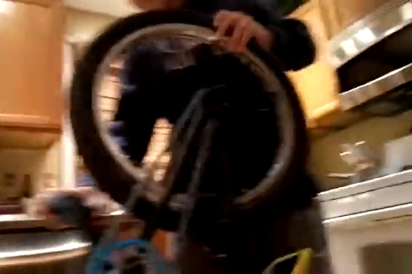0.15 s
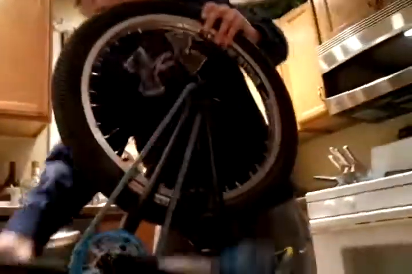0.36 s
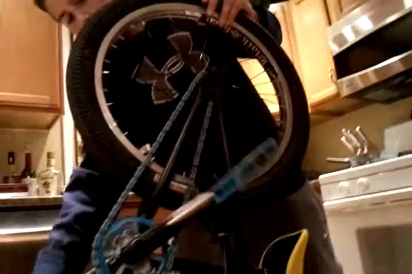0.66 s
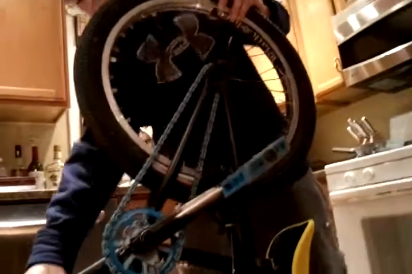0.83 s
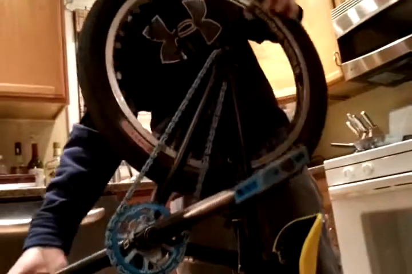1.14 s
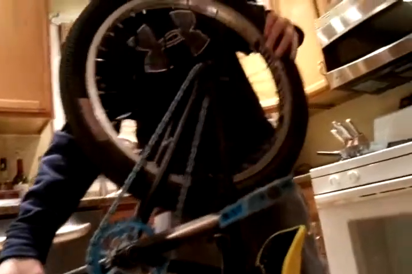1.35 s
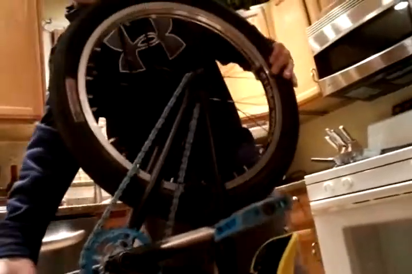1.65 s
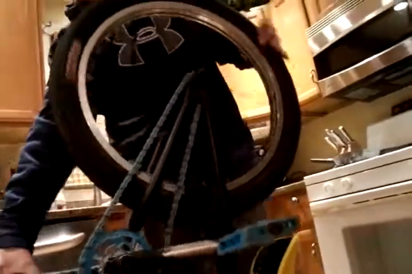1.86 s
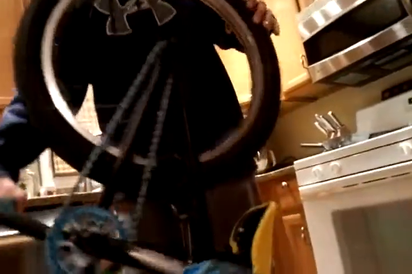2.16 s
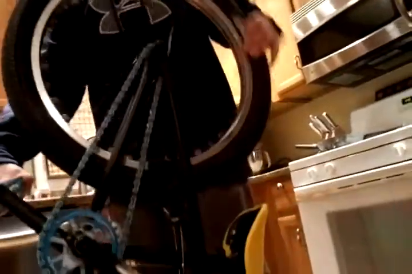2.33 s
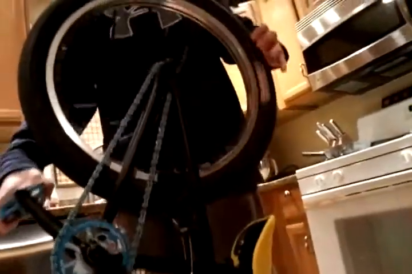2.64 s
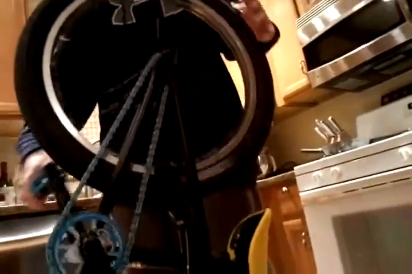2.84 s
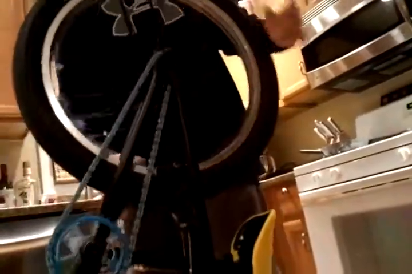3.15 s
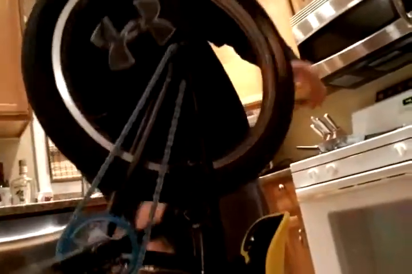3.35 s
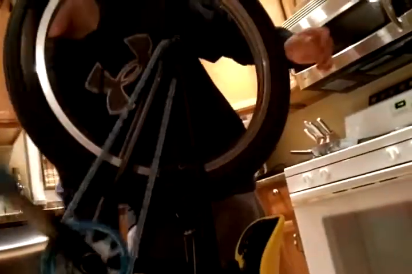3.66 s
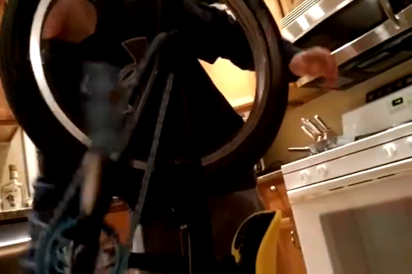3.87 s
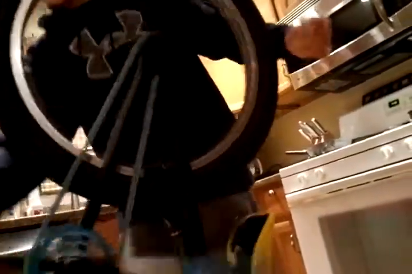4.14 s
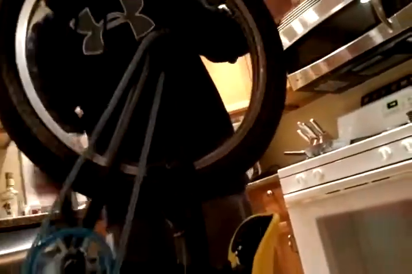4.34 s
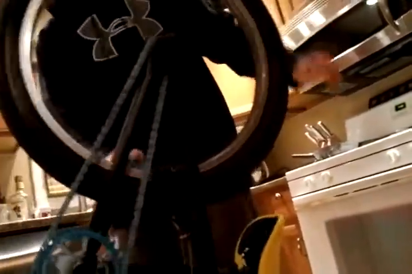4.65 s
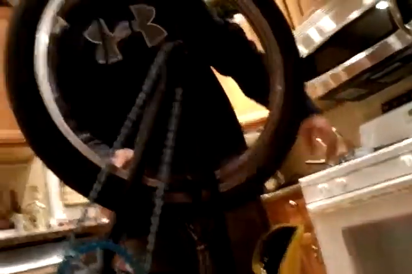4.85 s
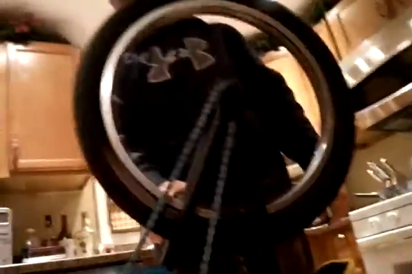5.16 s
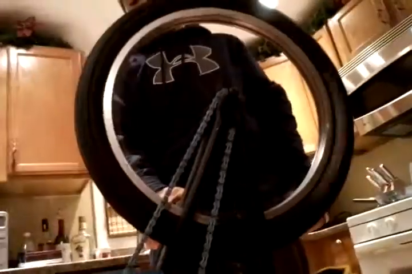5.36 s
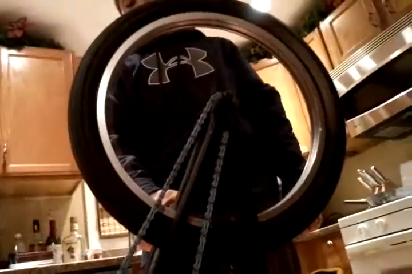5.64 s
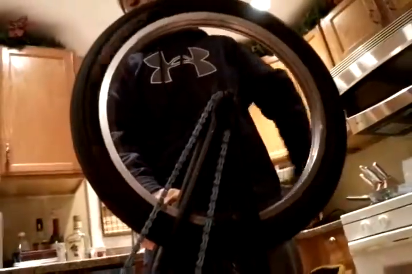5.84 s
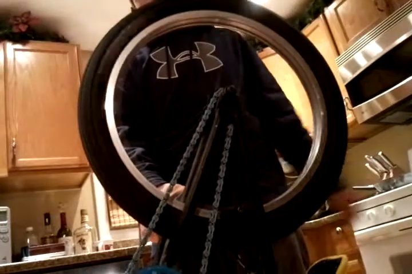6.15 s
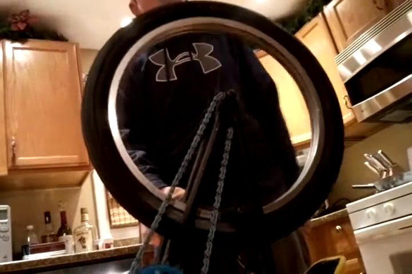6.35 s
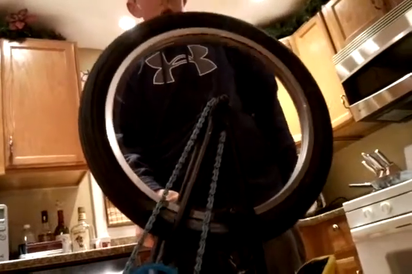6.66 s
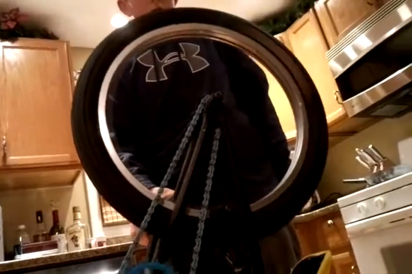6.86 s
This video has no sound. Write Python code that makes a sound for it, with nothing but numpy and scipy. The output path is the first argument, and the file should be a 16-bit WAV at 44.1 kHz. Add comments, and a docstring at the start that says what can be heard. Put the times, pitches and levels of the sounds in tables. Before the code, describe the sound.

A bicycle hub is heard close up in a small, hard-walled kitchen, over soft room air, very faint appliance tones and low microphone-handling rumble. From about 0.1 to 0.7 s, crisp metallic ratchet clicks run at some forty to fifty a second, with light frame knocks near 0.45-0.5 s and gritty chain rustle. Then it is mostly quiet: a tick and soft knock at 0.85, a sharp crack at 1.76, and the strongest dull, hollow clunk at 2.03 with a deep lurch of rumble. Faint stray ticks and chain rustle follow until 2.5. From 2.95, very soft, slightly uneven clicks quicken and strengthen, with small knocks around 3.45-3.5. At 4.65 the wheel runs free: a bright, fast, even buzz of about a hundred clicks a second with low popping, gently pulsing each turn, slowing to around eighty and continuing through the end at 7 s.

```python
"""A freewheel hub on an upside-down bicycle in a kitchen: the crank is turned by hand, then the rear wheel runs free.
Pawls click over ratchet teeth, slowly at first, then as a fast even buzz: filtered noise puffs and ringing modes.
Frame knocks are noise bursts with ringing tubes; the chain is clumped, coloured grain noise.
Behind lie room air, faint tones and the low rumble of the hand-held microphone; hard walls reflect the bicycle."""
import sys
import numpy as np
from scipy import signal
from scipy.fft import rfft, irfft, next_fast_len
from scipy.io import wavfile

SR = 44100
rng = np.random.default_rng(int(sys.argv[2]) if len(sys.argv) > 2 else 0)


def unload_wav(signal):
    """Save mono or channel-first audio to the path in sys.argv[1] as 16-bit WAV at rate SR, clipped to [-1, 1]."""
    wavfile.write(
        sys.argv[1],
        SR,
        np.round(np.clip(np.atleast_2d(signal).T, -1, 1) * 32767).astype(np.int16),
    )


N = 308700


def from_db(db):
    """Decibels to amplitude ratio."""
    return 10 ** (np.asarray(db) / 20)


def rms_one(x):
    """Scales a signal to an RMS of 1."""
    return x / np.sqrt(np.mean(x ** 2) + 1e-20)


def in_time(rows):
    """Amplitude curve through (time_s, level_db) points, straight in dB."""
    time_s, level_db = np.transpose(rows)
    return from_db(np.interp(np.arange(N) / SR, time_s, level_db))


def band(x, order, low_hz, high_hz):
    """Butterworth band-pass."""
    return signal.sosfilt(signal.butter(order, [low_hz, high_hz], "band", fs=SR, output="sos"), x)


def colour(x, spectrum):
    """Filters by (freq_hz, gain_db) points, interpolated over log frequency."""
    freq_hz, gain_db = np.transpose(spectrum)
    size = next_fast_len(len(x) + 2000)
    log_freq = np.log(np.arange(size // 2 + 1) * SR / size + 1)
    gain = from_db(np.interp(log_freq, np.log(freq_hz), gain_db))
    return irfft(rfft(x, size) * gain, size)[:len(x)]


def drift(cutoff_hz):
    """Slow random curve of RMS 1: low-passed noise."""
    low_pass = signal.butter(2, cutoff_hz, fs=SR, output="sos")
    return rms_one(signal.sosfilt(low_pass, rng.standard_normal(N)))


def strike(times_s, gains):
    """Train of impulses."""
    train = np.zeros(N + SR)
    np.add.at(train, np.round(np.asarray(times_s) * SR).astype(int), gains)
    return train[:N]


def ring(times_s, level_db, modes, spread_db, random_sign=True):
    """Each blow excites two-pole resonators (freq_hz, level_db, t60_s), each mode at a random strength."""
    out = np.zeros(N)
    luck = rng.standard_normal((len(times_s), len(modes), 2))
    for k, (freq_hz, mode_db, t60_s) in enumerate(modes):
        radius = from_db(-60 / (t60_s * SR))
        angle = 2 * np.pi * freq_hz / SR
        gains = from_db(level_db + mode_db + spread_db * luck[:, k, 0])
        if random_sign:
            gains = gains * np.sign(luck[:, k, 1])
        blows = strike(times_s, gains) + 1e-18  # keeps the filter off denormals
        out += signal.lfilter([0, np.sin(angle)], [1, -2 * radius * np.cos(angle), radius ** 2], blows)
    return out


def burst(times_s, level_db, t60_s):
    """Each blow releases exponentially decaying random-sign noise."""
    decay = from_db(-60 / (t60_s * SR))
    envelope = signal.lfilter([1], [1, -decay], strike(times_s, from_db(level_db)))
    return envelope * rng.choice([-1, 1], N)


def hub():
    """Ratchet clicks and low pops; a taut chain changes the click colour and the rings of the hub."""
    # rings of hub shell and spokes: freq_hz, coasting_db, taut_db, t60_s
    ring_modes = np.array([(2620, -37, -44, .03), (2850, -37, -50, .03), (3285, -32, -46, .03),
                           (3740, -46, -36, .07), (4460, -33, -36, .015)])
    # click spectra: freq_hz, gain_db
    coasting_colour = [(530, -43), (900, -20), (1250, -23.5), (1830, -19), (2770, -13), (2990, -14.5),
                       (3230, -6), (3550, -12.5), (3970, -11), (4290, -3), (5230, -2), (7000, -16.5),
                       (9100, -53.5), (15400, -120)]
    taut_colour = [(530, -40.5), (900, -18), (1120, -16.5), (1350, -23.5), (2090, -20), (2240, -19.5),
                   (3040, -17.5), (5010, -1), (6710, -12.5), (7000, -19.5), (9100, -48), (15400, -120)]
    # crank drives the wheel: start_s, end_s
    start_s, end_s = (2.9, 4.64)

    at_s, level_db, low_pops = teeth(scatter_db=0.5)
    taut = (at_s > start_s) & (at_s < end_s)
    coasting_modes, taut_modes = ring_modes[:, [0, 1, 3]], ring_modes[:, [0, 2, 3]]
    coasting = pawls(at_s[~taut], level_db[~taut], coasting_colour, coasting_modes, scatter_db=2.5)
    driven = pawls(at_s[taut], level_db[taut], taut_colour, taut_modes, scatter_db=1.0)
    return coasting + driven, low_pops


def teeth(scatter_db):
    """Times and levels of tooth drops: slow runs, stray ticks, then the buzz with its low pops."""
    # ratchet rotation, one click a tooth: time_s, teeth_passed
    backpedal = [(.0691, 0), (.0977, 1), (.198, 6), (.3346, 12), (.4117, 16), (.5613, 25), (.6434, 29),
                 (.6944, 31), (.7292, 32)]
    driven = [(2.9562, 0), (3.0445, 1), (3.3696, 5), (3.6372, 9), (3.8194, 12), (3.9716, 15), (4.1835, 20),
              (4.3618, 25), (4.6526, 34)]
    freewheel = [(4.6618, 0), (4.7409, 8), (4.8109, 16), (4.8858, 24), (4.9724, 32), (5.1596, 48),
                 (5.4496, 72), (6.3336, 144), (7.0486, 200)]
    # relative click strength: time_s, level_db
    click_levels = [(.07, -18), (.25, -18.5), (.45, -16.5), (.65, -18.5), (.73, -20), (2.95, -38.5),
                    (3.06, -31), (3.8, -28), (4.0, -25), (4.15, -22.5), (4.46, -20), (4.56, -24.5),
                    (4.652, -21), (4.662, -23), (4.69, -18), (6.0, -17), (7.0, -16.5)]
    # faint driven clicks: time_s, loss_db
    faint = [(3.213, 3.5), (3.381, 4), (3.82, 6), (4.184, 31), (4.364, 10), (4.524, 6)]
    # stray ticks while the wheel is held, relative strength: time_s, level_db
    ticks = [(0.848, -24), (0.9134, -36.5), (1.3182, -38.5), (2.2387, -33), (2.3515, -27.5),
             (2.4468, -31.5), (2.54, -43.5)]
    teeth_per_turn, loudest_tooth, worn_tooth = 24, 8, 23
    turn_swing_db, worn_loss_db = 0.8, 4
    pop_start_db, pop_swing_db = -1.5, 1
    pop_fade_from_s, pop_fade_db_per_s = 5.8, 5

    limp_teeth = 0.13  # every other driven click comes late
    slow_s = np.r_[passing(backpedal)[1], passing(driven, limp_teeth)[1]]
    slow_db = np.interp(slow_s, *np.transpose(click_levels))
    slow_db += scatter_db * rng.standard_normal(len(slow_s))
    for time_s, loss_db in faint:
        slow_db[np.argmin(abs(slow_s - time_s))] -= loss_db

    # freewheeling: clicks swell once a turn, one tooth is weak
    tooth, fast_s = passing(freewheel)
    swell = np.cos(2 * np.pi * (tooth - loudest_tooth) / teeth_per_turn)
    worn_db = worn_loss_db * (tooth % teeth_per_turn == worn_tooth)
    fast_db = np.interp(fast_s, *np.transpose(click_levels)) + turn_swing_db * swell - worn_db
    pop_fade_db = pop_fade_db_per_s * np.maximum(fast_s - pop_fade_from_s, 0)
    pop_db = pop_start_db - pop_fade_db + pop_swing_db * swell - worn_db

    tick_s, tick_db = np.transpose(ticks)
    return np.r_[slow_s, tick_s, fast_s], np.r_[slow_db, tick_db, fast_db], pops(fast_s, pop_db)


def passing(turning, limp_teeth=0):
    """Numbers and times of teeth passing the pawls; odd teeth are delayed by limp_teeth."""
    time_s, passed = np.transpose(turning)
    tooth = np.arange(int(passed[-1]) + 1)
    return tooth, np.interp(tooth + limp_teeth * (tooth % 2), passed, time_s)


def pawls(at_s, level_db, spectrum, modes, scatter_db):
    """The first pawl snaps home, two more follow within milliseconds, one bounces; the hub shell rings."""
    luck = rng.random((len(at_s), 8))
    lags_s = np.array([0, .0008, .0024, .007]) + np.array([.0003, .0008, .0012, .002]) * luck[:, :4]
    loss_db = scatter_db * luck[:, 4:] * [0.99, 1, 0.92, 0.96]
    drops_db = np.array([-2.5, -3.5, -6.5, -8.5]) - loss_db
    times_s = (at_s[:, None] + lags_s).ravel()
    each_db = (level_db[:, None] + drops_db).ravel()
    snap = colour(burst(times_s, each_db + 11.0, t60_s=0.006), spectrum)
    return snap + ring(at_s, level_db + 9.5, modes, spread_db=3.5)


def pops(times_s, level_db):
    """Each fast tooth gives two band-passed impulses, about a millisecond apart, of random sign and size."""
    luck = rng.uniform(-0.87, 1, (len(times_s), 4))
    lags_s = np.array([.0003, .0013]) + 0.00052 * luck[:, :2]
    sizes = np.sign(luck[:, 2:]) * (0.22 + luck[:, 2:] ** 2)
    gains = from_db(level_db)[:, None] * sizes
    blows = strike((times_s[:, None] + lags_s).ravel(), gains.ravel())
    return band(blows, 2, 100, 750)


def knocks():
    """Noise crack, dull noise tail and ringing tubes; apart from them, a boom and a low rocking."""
    # frame knocks, relative levels: time_s, body_db, crack_db, sway_db, boom_db
    blows = [(0.443, -28.5, -34, -54, -54), (0.461, -25.5, -25, -51, -57), (0.514, -28, -34, -46, -48),
             (0.848, -36, -53, -42, -43.5), (1.758, -32.5, -19.5, -60, -57), (2.003, -36, -48, -39, -46.5),
             (2.029, -11, -46, -20.5, -41), (3.436, -34.5, -32, -62, -65), (3.512, -31, -36, -55, -47.5)]
    # frame tubes: freq_hz, level_db, t60_s
    tube_modes = [(231, -11, .08), (307, -9, .13), (640, -12, .07), (958, -14, .07), (1280, -14, .05),
                  (1550, -14, .05)]
    # whole bicycle rocking: freq_hz, level_db, t60_s
    sway_modes = [(21.2, -6, 0.27), (31.8, 2, 0.12)]
    # tyre and floor: freq_hz, level_db, t60_s
    boom_modes = [(145.6, 1.5, 0.21)]

    at_s, body_db, crack_db, sway_db, boom_db = np.transpose(blows)
    crack = band(burst(at_s, crack_db + 4.0, t60_s=0.0021), 2, 1000, 3500)
    thud = band(burst(at_s, body_db + 4.0, t60_s=0.026), 3, 160, 1800)
    tubes = ring(at_s, body_db - 11.0, tube_modes, spread_db=2.0)
    sway = ring(at_s, sway_db + 2.0, sway_modes, spread_db=3.0, random_sign=False)
    boom = ring(at_s, boom_db + 4.5, boom_modes, spread_db=1.0)
    return crack + thud + tubes, sway + boom


def chain():
    """Dense tiny contacts of rollers and links, coming in clumps: noise of uneven, drifting level."""
    # chain over the sprockets: time_s, level_db (rms)
    levels = [(0.0, -57.5), (0.12, -52), (0.47, -52), (0.6, -42.5), (0.76, -45.5), (0.8, -52),
              (0.97, -56.5), (1.11, -58), (1.66, -60.5), (1.72, -53), (1.82, -57.5), (2.0, -54.5),
              (2.07, -49), (2.44, -48), (2.55, -59), (3.9, -59.5), (4.2, -51), (4.7, -49)]
    # relative spectrum: freq_hz, gain_db
    spectrum = [(530, -12.5), (900, -8.5), (1310, -9.5), (2160, -9), (2370, -9.5), (2560, -8.5),
                (5180, -6.5), (6260, -7.5), (7000, -17.5), (9100, -52), (15400, -120)]
    grains = rng.standard_normal(N) * from_db(1.7 * np.minimum(rng.exponential(1, N), 4))
    clumps = grains * from_db(1.2 * drift(20))
    return in_time(levels) * rms_one(colour(clumps, spectrum))


def kitchen(x):
    """Dense reflections off hard walls: five decaying noise tails crossfade in rotation."""
    late_t60_s, early_t60_s = 0.49, 0.065
    early_db, room_db = 2.5, -0.5  # early part (cupboards, floor) re late part; room re direct sound
    tails_per_s = 11.0
    t = np.arange(SR // 2) / SR
    late = from_db(-60 * t / late_t60_s)
    early = from_db(early_db - 60 * t / early_t60_s)
    fade_in = np.clip(t / 0.0023, 0, 1)
    turn = np.arange(N) / SR * tails_per_s % 5
    out = np.zeros(N)
    for k in range(5):
        tail = rng.standard_normal(len(t)) * (late + early) * fade_in
        distance = abs((turn - k + 2.5) % 5 - 2.5)  # circular, in tails
        share = np.cos(np.pi / 2 * np.clip(distance, 0, 1))
        out += signal.fftconvolve(x * share, tail / np.sqrt(np.sum(tail ** 2)))[:N]
    return from_db(room_db) * out


def hand():
    """Hand on the microphone: deep rumble that swells quickly at each lurch and sinks back."""
    # lurches: peak_s, peak_db (rms)
    lurches = [(0.05, -47), (0.68, -54), (0.89, -48), (2.1, -26.5), (2.55, -41), (3.0, -43), (3.6, -37),
               (3.93, -44), (4.57, -37), (6.45, -40.5)]
    steady_db, rise_db_per_s, fall_db_per_s = -54.0, 204, 79.5
    t = np.arange(N) / SR
    level_db = np.full(N, steady_db)
    for peak_s, peak_db in lurches:
        below_db = np.maximum(rise_db_per_s * (peak_s - t), fall_db_per_s * (t - peak_s))
        level_db = np.maximum(level_db, peak_db - below_db)
    rumble = band(rng.standard_normal(N), 3, 12, 36)
    return from_db(level_db) * rms_one(rumble)


def appliance_hum():
    """Faint appliance tones: sines of slowly wavering level."""
    # tones: freq_hz, level_db (rms, before wavering)
    tones = [(278, -65.5), (926, -72.5)]
    t = np.arange(N) / SR
    out = np.zeros(N)
    for freq_hz, level_db in tones:
        out += from_db(level_db + 1.0 * drift(0.93)) * np.sqrt(2) * np.sin(2 * np.pi * freq_hz * t)
    return out


def room_air():
    """Steady coloured noise."""
    # relative spectrum: freq_hz, gain_db
    spectrum = [(24, -33.5), (40, 0), (59, -4.5), (91, -1), (159, -8.5), (280, -10), (559, -12), (898, -20),
                (1220, -22.5), (1720, -44.5), (2180, -34), (2700, -33), (7000, -32.5), (9100, -64),
                (15400, -120)]
    level_db = -54.5  # rms
    return from_db(level_db) * rms_one(colour(rng.standard_normal(N), spectrum))


def scene():
    """Clicks and frame sound excite the room; all else is added dry."""
    clicks, low_pops = hub()
    frame, lows = knocks()
    bike = clicks + frame
    background = hand() + appliance_hum() + room_air()
    return (bike + kitchen(bike) + low_pops + lows + chain() + background)[None]


def record(dry):
    """The treble rolls off into a steep top cut; a steady offset is added."""
    offset, rolloff_hz, cutoff_hz = 0.1089, 6900, 7500
    soft = signal.sosfilt(signal.butter(4, rolloff_hz, fs=SR, output="sos"), dry)
    top_cut = signal.ellip(12, 1, 70, cutoff_hz, fs=SR, output="sos")  # ripple 1 dB, stop band -70 dB
    return offset + signal.sosfilt(top_cut, soft)


dry = scene()
out = record(dry)
unload_wav(out)
```